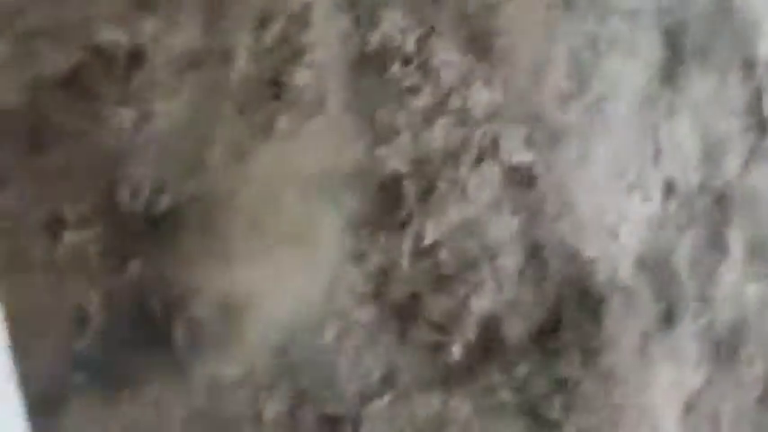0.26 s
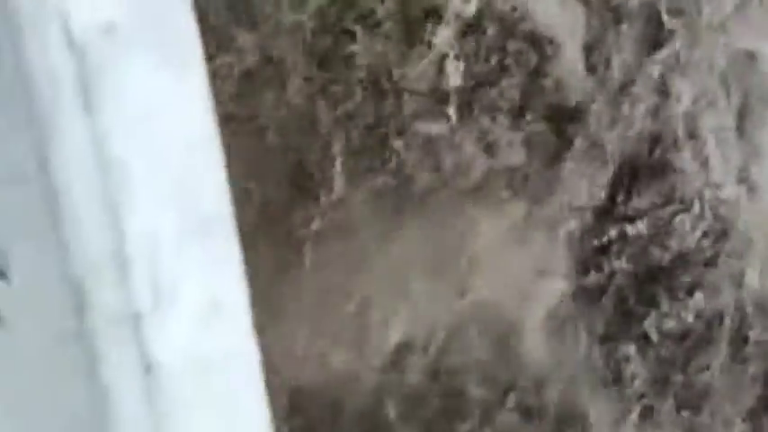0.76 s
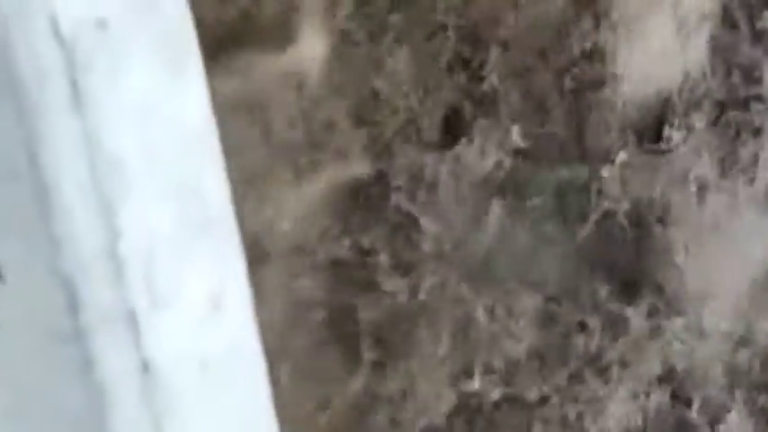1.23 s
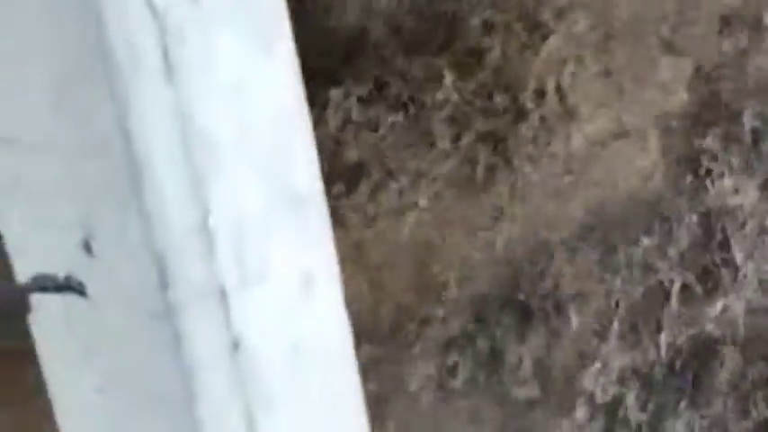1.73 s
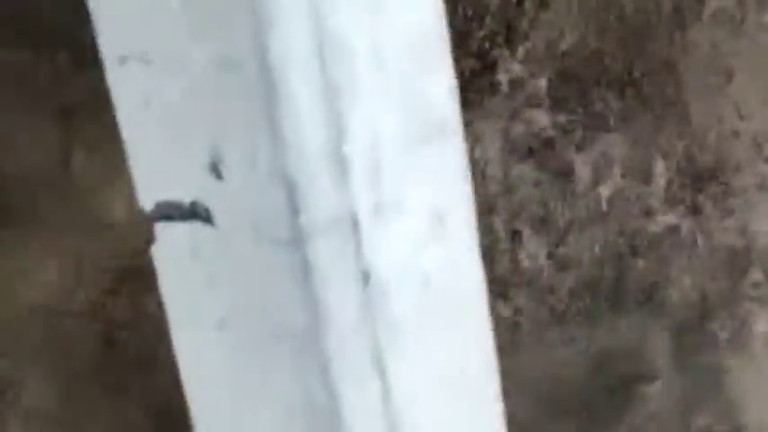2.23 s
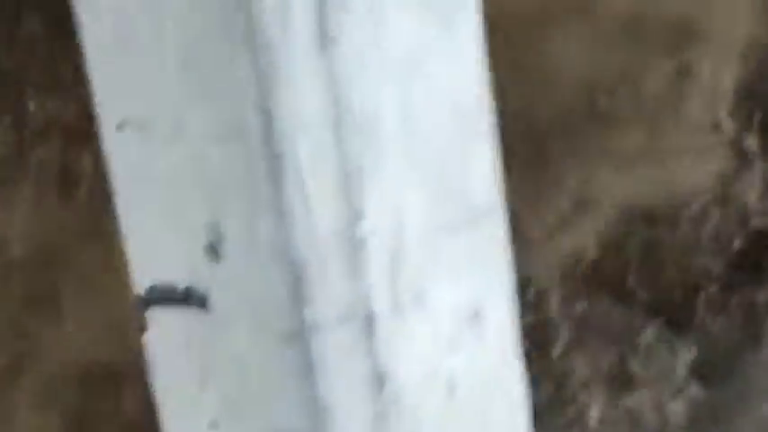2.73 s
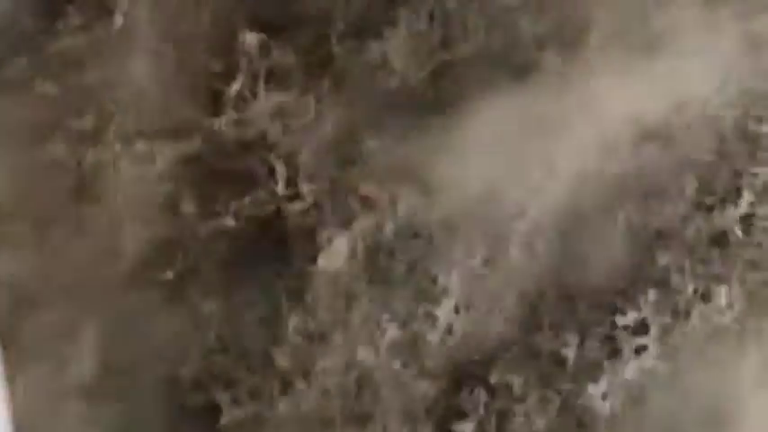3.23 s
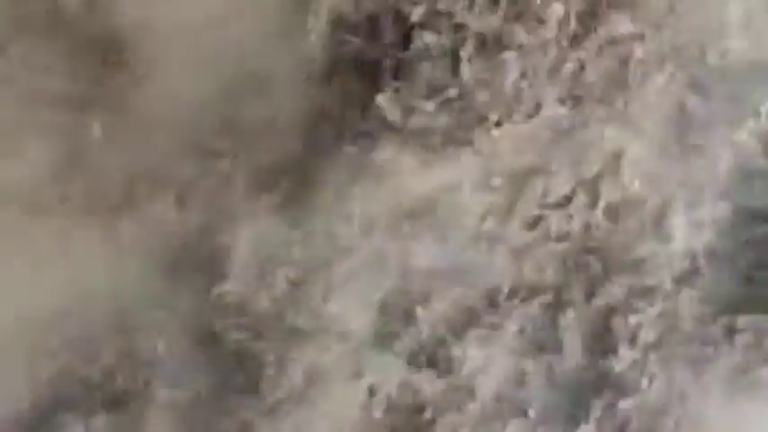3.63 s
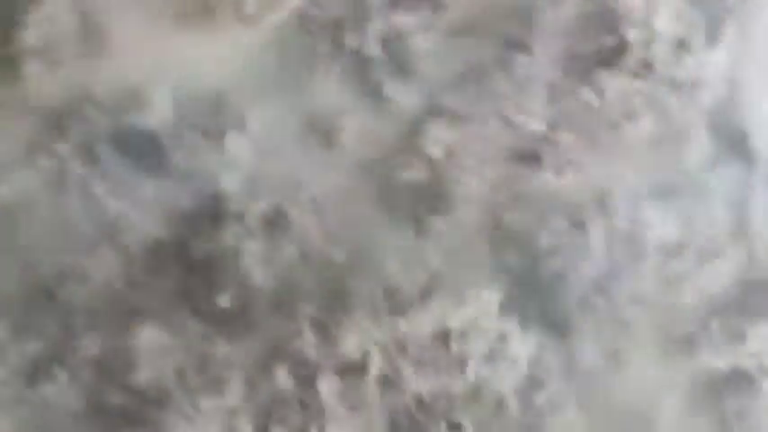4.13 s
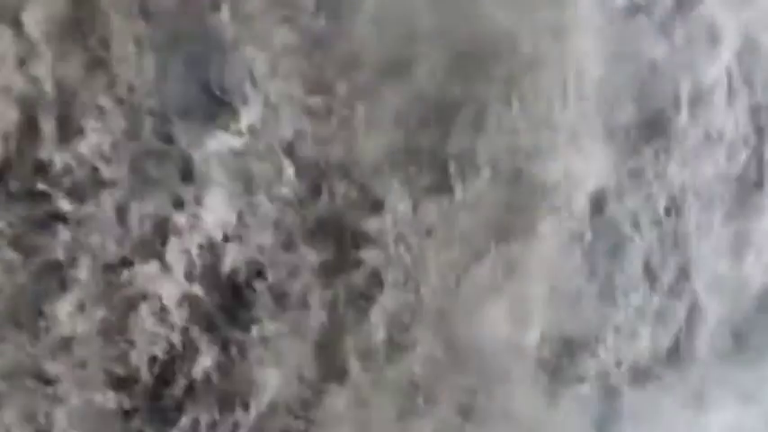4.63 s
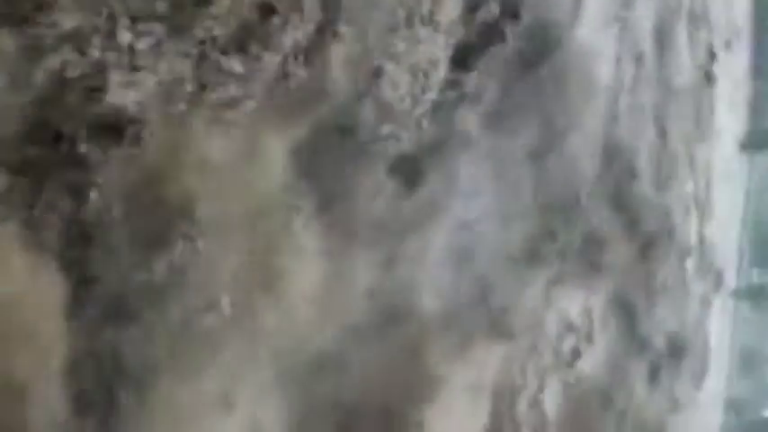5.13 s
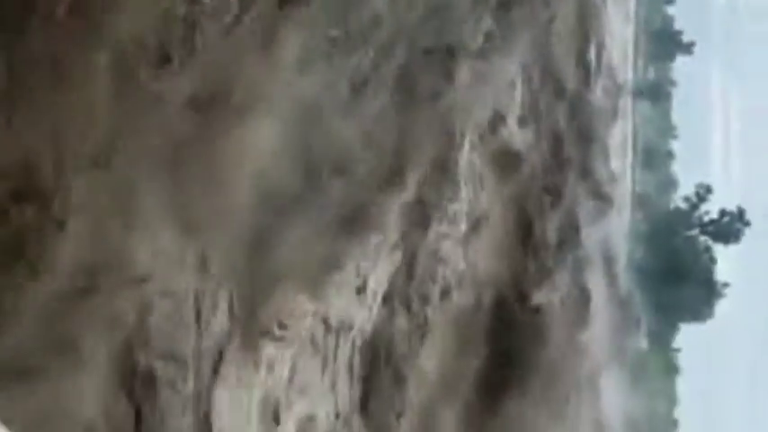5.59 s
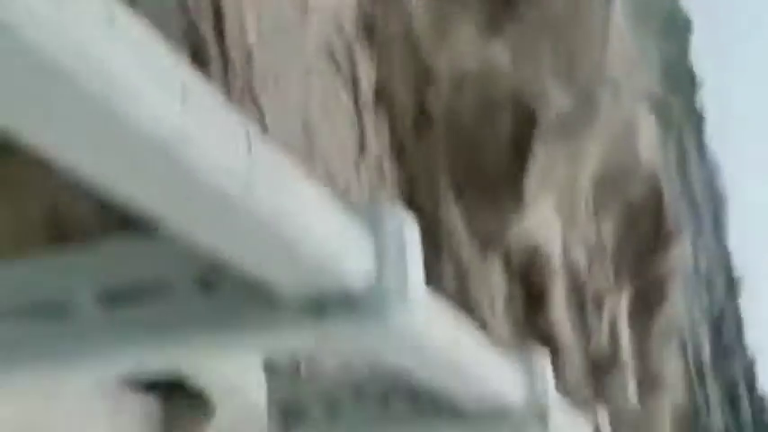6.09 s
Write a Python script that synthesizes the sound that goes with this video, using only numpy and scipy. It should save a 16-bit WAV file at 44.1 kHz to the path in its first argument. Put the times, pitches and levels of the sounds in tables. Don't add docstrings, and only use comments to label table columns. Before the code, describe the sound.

Loud, dense white-water roar fills everything from start to end, outdoors under a bridge. Low rumble lies beneath turbulent mid churn, with fizzing spray above. Brief surges come around the middle, then the tone becomes slightly fuller and duller as the phone tips towards the distant water. It is captured close on a small stereo phone, near overload, with ringing highs, a cut-off top and grainy compression.

```python
import sys
import numpy as np
from scipy import signal
from scipy.io import wavfile
from scipy.ndimage import uniform_filter1d

SR = 44100
rng = np.random.default_rng(int(sys.argv[2]) if len(sys.argv) > 2 else 0)


def dump(signal):
    limited = np.clip(np.atleast_2d(signal).T, -1, 1)
    pcm = np.round(limited * 32767).astype(np.int16)
    wavfile.write(sys.argv[1], SR, pcm)


def ratio_of_db(decibels):
    return 10 ** (np.asarray(decibels, float) / 20)


N = 280035
HOP = 256
EDGE_HZ = 14270

# pitch_hz, likeness
LIKENESS = [(30, .98), (60, .985), (170, .981), (320, .92), (440, .75), (600, .45), (760, .45), (1050, .05),
            (1300, -.3), (1800, -.05), (2300, .2), (2750, .02), (3050, -.3), (3650, .05)]


def evened(x):
    return x / np.sqrt(np.mean(abs(x) ** 2) + 1e-20)


def read(points, hz, order=1):
    table = np.transpose(points)
    return np.interp(np.log(hz + 1), np.log(table[0] + 1), table[order])


def stirring(hz, t):
    # pitch_hz, patch_db, surge_db
    stir_depths = [(100, 0, 0), (1000, .3, .1), (2500, .5, .1), (6000, .6, .3), (13000, 1.1, .45)]
    patches = rng.standard_normal((len(t), len(hz), 2)).T
    patches = uniform_filter1d(patches, size=24, axis=1)
    patches = evened(uniform_filter1d(patches, size=12, axis=2))
    alike = np.clip(read(LIKENESS, hz), 0, 1)[:, None]
    patches[1] = alike * patches[0] + np.sqrt(1 - alike ** 2) * patches[1]
    rates_hz = np.geomspace(3, 24, 30)
    surge = evened(sum(np.sin(2 * np.pi * (f * t + rng.random())) / np.sqrt(f) for f in rates_hz))
    patch_db = read(stir_depths, hz)[:, None] * patches
    surge_db = read(stir_depths, hz, order=2)[:, None] * surge
    return patch_db + surge_db


def deck_echo(hz, t):
    # time_s, level_db
    deck_strength = [(0, 0.), (.45, 0.2), (.95, -0.7), (1.35, 1.2), (1.75, 0), (2.9, 0.2), (3.3, -1.8),
                     (4.3, -4.5), (5.15, -1.1), (5.9, -0.7), (6.35, 0)]
    # pitch_hz, share
    echo_share = [(200, 0.83), (700, .75), (1150, .75), (2000, 0.071), (2600, .15), (3200, 0.59),
                  (4000, -0.11), (9000, 0.053)]
    return np.outer(read(echo_share, hz), np.interp(t, *np.transpose(deck_strength)))


def far_river(hz, t):
    # pitch_hz, level_db
    far_colour = [(300, -0.1), (650, 2.5), (1200, 0.1), (2200, 0.75), (5000, 0), (9000, 0.7), (13000, -1.2)]
    tip_start_s, tip_end_s = 4, 4.8
    tipped = np.clip((t - tip_start_s) / (tip_end_s - tip_start_s), 0, 1)
    return np.outer(read(far_colour, hz), tipped)


def hollow(hz, t, turn_db):
    centre_hz, width_hz = 3160, 380
    open_db, open_s, db_per_turn_db = 2.5, 0.44, -1.2
    shape = np.exp(-((hz - centre_hz) / width_hz) ** 2)
    return np.outer(shape, open_db * np.exp(-(t / open_s) ** 2) + db_per_turn_db * turn_db)


def breaking_waves(t):
    # middle_s, level_db, length_s
    wave_list = [(.08, -0.3, .1), (.42, 0.8, 0.23), (.6, -0.3, .1), (1.43, -1.6, .12), (2.2, 0, .1),
                 (2.76, 2, 0.07), (2.96, 2.4, 0.081), (3.134, -0.9, .12), (3.263, 1.2, 0.11),
                 (3.42, 0, .12), (4.066, 1.9, 0.074), (4.299, 1, .1), (4.76, -0.1, .1), (4.87, 1.7, 0.062),
                 (5.3, 0.1, 0.27), (5.49, -1.1, 0.13), (6.003, -1.3, 0.57), (6.332, 2, 0.06)]
    return sum(db * np.exp(-(2 * (t - s) / length) ** 2) for s, db, length in wave_list)


def layer_gain(colour, hz, t):
    handover_hz = [450, 2600, 7000]
    # level_db, share of a wave (1 = all of it)
    layer_levels = [
        (-23, 0.52),
        (-22.5, 0.79),
        (-24, 1.06),
        (-17, 0.48),
    ]
    # time_s, left_minus_right_db
    phone_turn = [(0, -0.9), (1.0, -.5), (1.7, 0), (2.25, 1.2), (2.7, 0.2), (3.1, 0.1), (3.5, -0.5),
                  (4.85, 1.4), (5.3, 0.1), (6.0, -0.3), (6.35, -.3)]
    lean = [0.82, 0.92, .3]
    pan_db_per_s = -0.2
    above = [1 / (1 + np.exp(-8 * np.log((hz + 1) / f))) for f in handover_hz]
    shares = -np.diff([np.ones(len(hz))] + above + [np.zeros(len(hz))], axis=0)
    heard_power = (colour ** 2).mean(0) * (hz < EDGE_HZ)
    own_db = 10 * np.log10(shares @ heard_power)
    wave_db = breaking_waves(t)
    field_db = sum(np.outer(share, db + wave * wave_db - own)
                   for share, (db, wave), own in zip(shares, layer_levels, own_db))
    turn_db = np.interp(t, *np.transpose(phone_turn))
    field_db = field_db + deck_echo(hz, t) + far_river(hz, t) + hollow(hz, t, turn_db)
    lean_db = np.outer(np.dot(lean, shares[1:]), turn_db)
    pan_db = np.outer(shares[-1], pan_db_per_s * (t - t.mean()))
    facing_db = (lean_db + pan_db) / 2
    return ratio_of_db(field_db + np.array([facing_db, -facing_db]))


def cavity(hz, centre_hz, width_hz):
    u = hz / centre_hz
    return 1 / np.abs(1 - u ** 2 + 1j * u * width_hz / centre_hz)


def port_colour(hz):
    # pitch_hz, level_db
    water_colour = [(20, 1), (60, -1.5), (170, 1), (330, 0), (600, -6), (1150, -6.5), (1950, -5.5),
                    (2450, -9.5), (3100, -12), (3800, -10), (6000, -12.5), (9000, -19.5), (12000, -17),
                    (14300, -15.5)]
    # pitch_hz, left_minus_right_db
    body_shadow = [(350, 0), (600, .8), (1100, .3), (1900, 1.7), (3100, 1), (5000, -1), (9000, 0),
                   (12000, -1.5), (14000, -3)]
    # pitch_hz, width_hz
    port_cavities = [
        (9900, 1600),
        (8600, 1250),
    ]
    shadow_db = read(body_shadow, hz) / 2
    ringing = np.array([cavity(hz, *port) for port in port_cavities])
    return ratio_of_db(read(water_colour, hz) + np.array([shadow_db, -shadow_db])) * ringing


def river():
    # pitch_hz, likeness a quarter turn ahead
    right_lead = [(120, 0), (300, .06), (600, .19), (1000, .12), (1300, .17), (1650, 0)]
    t, hz = np.arange(N // HOP + 5) * HOP / SR, np.fft.rfftfreq(4 * HOP, 1 / SR)
    a, b, c, d = rng.standard_normal((len(t), len(hz), 4)).T
    left, fresh = a + 1j * b, c + 1j * d
    same = (read(LIKENESS, hz) + 1j * read(right_lead, hz))[:, None]
    right = same * left + np.sqrt(1 - abs(same) ** 2) * fresh
    colour = port_colour(hz)
    z = np.array([left, right]) * colour[:, :, None]
    z *= layer_gain(colour, hz, t) * ratio_of_db(stirring(hz, t))
    return ratio_of_db(4.0) * signal.istft(z, nperseg=4 * HOP, noverlap=3 * HOP)[1][:, :N]


def thinned(x):
    # pitch_hz, level_db
    drop_below = [(60, -17.5), (170, -16.3), (330, -10.5), (450, -13), (700, -14), (1300, -5.5),
                  (2200, -6.5), (3000, -2.6), (3500, -2.7), (4500, -3.6), (6500, -4.6), (9000, -11),
                  (11500, -5.5), (14000, -3.8)]
    depth_db, soft_db = -42.0, .5
    hz, _, z = signal.stft(x, SR, nperseg=8 * HOP, noverlap=6 * HOP)
    power = uniform_filter1d(abs(z) ** 2, size=5, axis=1)
    power = uniform_filter1d(power, size=3, axis=2)
    usual = uniform_filter1d(power.mean(0), size=9, axis=0)
    usual = abs(uniform_filter1d(usual, size=240, axis=1)) + 1e-20
    usual = usual * power.sum((0, 1)) / (2 * usual.sum(0))
    rel_db = 10 * np.log10(abs(power) / usual + 1e-12)
    dropped = .5 - .5 * np.tanh((rel_db - read(drop_below, hz)[:, None]) / soft_db)
    return signal.istft(z * ratio_of_db(depth_db * dropped), nperseg=8 * HOP, noverlap=6 * HOP)[1][:, :N]


def scene():
    return river()


def top_cut(x):
    return signal.sosfilt(signal.butter(12, 15100, fs=SR, output="sos"), x)


def record(dry):
    squeezed = dry / (1 + abs(dry / .95) ** 8) ** (1 / 8)
    low_pass = signal.firwin(1023, EDGE_HZ, window=("kaiser", 9), fs=SR)
    limited = signal.oaconvolve(squeezed, low_pass[None], "same")
    sum_difference = np.array([[1, 0.91], [1, -1.01]]) / np.sqrt(2)
    once = thinned(limited)
    twice = thinned(sum_difference @ once)
    return top_cut(sum_difference @ twice)


dry = scene()
out = record(dry)
dump(out)
```